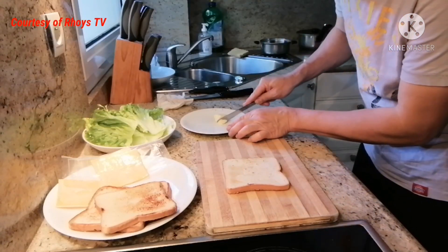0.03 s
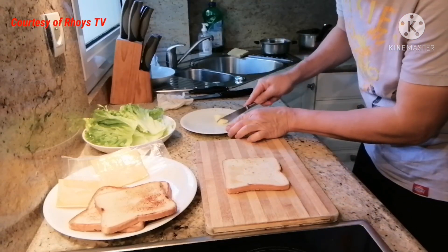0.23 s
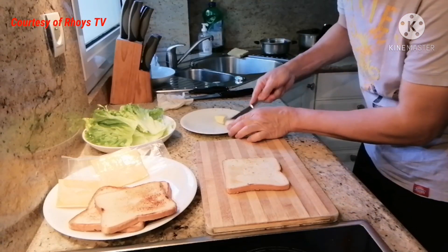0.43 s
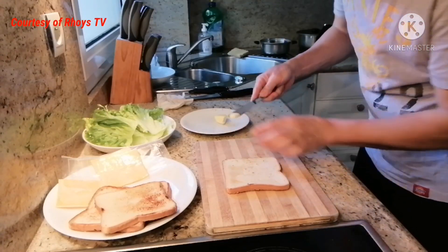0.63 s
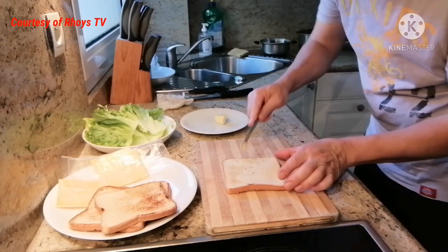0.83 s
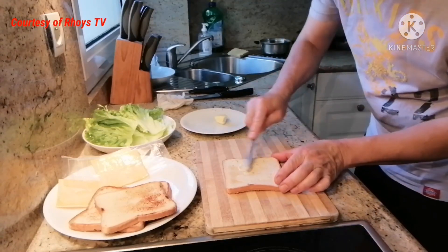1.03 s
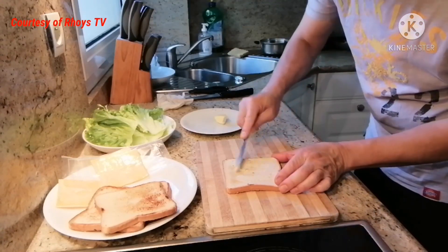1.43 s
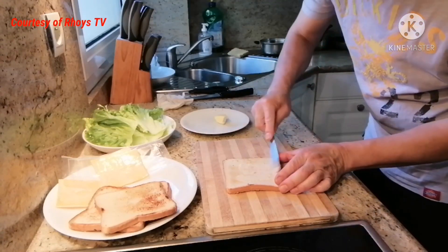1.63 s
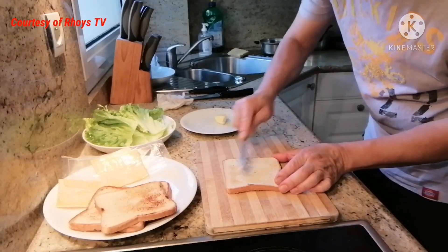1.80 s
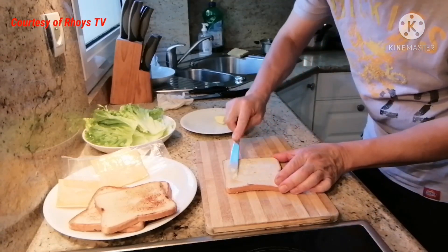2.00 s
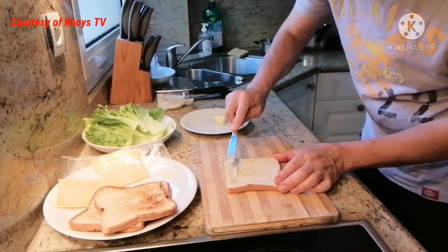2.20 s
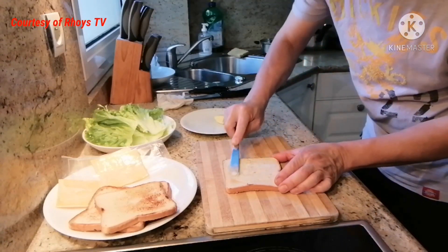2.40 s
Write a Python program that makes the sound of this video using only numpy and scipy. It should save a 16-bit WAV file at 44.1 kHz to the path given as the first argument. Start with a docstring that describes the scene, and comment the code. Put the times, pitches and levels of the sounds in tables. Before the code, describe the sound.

A knife spreads butter on toast. At 0.2 seconds it clinks sharply on a plate, then slides off with a light scrape and thin squeak until 0.6. Fingers rustle faintly around 1 second. Crackly strokes with a slight steel ring come at 1.2, 1.6 and 2.0 seconds, and a brief fourth at 2.5. The small kitchen adds a short echo, soft hiss and low hum.

```python
"""A table knife cuts through butter and clinks on the plate; the recorder's gain dips, then recovers.
The edge slides off the plate with a scrape and a thin squeak, and fingers rustle on a slice of toast.
Then the knife spreads the butter in four quick strokes: the crust crackles under the edge in
thousands of tiny snaps, which set the steel blade ringing.
All along, the small, quiet kitchen adds a short echo, a soft hiss and a low mains hum."""
import sys
import numpy as np
from scipy import signal
from scipy.fft import rfft, irfft
from scipy.io import wavfile

SR = 44100
rng = np.random.default_rng(int(sys.argv[2]) if len(sys.argv) > 2 else 0)


def to_wav(sig):
    """Store sig (one row per channel, or 1-D mono) as 16-bit WAV at the path in sys.argv[1].

    Samples outside -1..1 are clipped; the rate is SR.
    """
    pcm = np.clip(np.atleast_2d(sig), -1, 1) * 32767
    pcm = np.round(pcm).astype(np.int16)
    wavfile.write(sys.argv[1], SR, pcm.T)  # frames by channels


N = 112454
TIME_S = np.arange(N) / SR


# how hard the knife presses, one list per stroke: time_s, pressure_db, rasp_offset_db, ring_offset_db
STROKES = [
    [(1.2, -88, -7, 8), (1.21, -69, 7, -19), (1.216, -54, -27, -7), (1.24, -54, -5.5, 4),
     (1.286, -54.5, 0, -0.5), (1.34, -53.5, -3.5, -1), (1.356, -59.5, -5, -10), (1.372, -52, -7.5, -1),
     (1.398, -56, -6.5, -6), (1.425, -81, -6, -2)],
    [(1.592, -71, -6, 0.5), (1.596, -46, -16, -16), (1.609, -47, -22, -5), (1.641, -40, -21, -5.5),
     (1.659, -48, -6, -0.5), (1.708, -48.5, -8.5, -0.5), (1.719, -47.5, -5.5, 12), (1.737, -43.5, -6.5, -4),
     (1.817, -53, -5, 3.5), (1.845, -75, -4, -9)],
    [(2.03, -44.5, -11.5, -6.5), (2.066, -63, -9, -7), (2.085, -48.5, -10.5, -8), (2.112, -54.5, -9, -4.5),
     (2.158, -42, -11, -4.5), (2.18, -46.5, -13.5, -2), (2.245, -39.5, -14, -6), (2.28, -59.5, -9, -12),
     (2.31, -60, -23, 1.5)],
    [(2.515, -56, -12, -3.5), (2.531, -51.5, -15, -9), (2.549, -68, -26, -13)],
]
def spreading(glide_share=.014):
    """Pressing harder makes crust, crumbs and blade louder; the ring rises a little in each stroke."""
    pressure, rasp_force, ring_force, glide = np.zeros((4, N))
    for stroke in STROKES:
        time_s, pressure_db, rasp_offset_db, ring_offset_db = np.transpose(stroke)
        pressure += level(time_s, pressure_db)
        rasp_force += level(time_s, pressure_db + rasp_offset_db)
        ring_force += level(time_s, pressure_db + ring_offset_db)
        glide += np.interp(TIME_S, [time_s[0], time_s[-1]], [-glide_share, glide_share], left=0, right=0)
    scrape = crust(pressure, rasp_force) + blade_swell()
    crunch = crumbs(pressure)
    scrape += blade(ring_force, glide)
    return kitchen(scrape, early_db=6.5, tail_db=-8.5) + kitchen(crunch)


# tone of the crust's fine, high crackle: pitch_hz, level_db
CRACKLE_TONE = [(1200, -12.5), (2200, -42), (4500, -1.5), (7500, 2), (8300, -3.5), (13500, -8.5),
                (15200, -0.5), (16200, -42)]
# tone of its lower rasp: pitch_hz, level_db
RASP_TONE = [(150, -22), (500, -17), (1000, -14), (1400, -4), (1750, 0), (2700, 1), (3600, -2), (5000, -12),
             (9000, -40)]
def crust(pressure, rasp_force):
    """Tiny grains of crust snap under the moving edge."""
    crackle = through(pressure * snaps(), colour(CRACKLE_TONE))
    rasp = through(rasp_force * snaps(), colour(RASP_TONE))
    return amp(-4.5) * crackle + amp(1) * rasp


# the notes of the steel blade: pitch_hz, width_hz, level_db, left_over_right_db
BLADE_NOTES = [(3150, 330, -7, 2), (5950, 400, -5, 8), (6930, 400, 0, 1), (7380, 300, -6, 2),
               (10200, 600, -14, 0), (14600, 500, -3, 7)]
def blade(force, glide, wander_share=.018):
    """The scraped blade rings; its notes shift as the point of contact moves."""
    drive = force * snaps()
    sound = np.zeros((2, N))
    for pitch_hz, width_hz, level_db, side_db in BLADE_NOTES:
        moving_hz = pitch_hz * (1 + glide + wander_share * wobble(step_s=.018))
        sound += amp(level_db) * pan(side_db) * resonate(drive, moving_hz, width_hz)
    return amp(-4) * sound


# a low and a high note of the blade: pitch_hz, width_hz, level_db, left_over_right_db
LOW_NOTE, HIGH_NOTE = (3190, 420, 0, 3), (6760, 600, 0, 4)
# loudness of the low note: time_s, level_db
SWELL_LEVELS = [(1.668, -56), (1.682, -58), (1.7, -53), (1.72, -76)]
def blade_swell():
    """The blade's low note swells in the middle of the second stroke."""
    return through(level(*np.transpose(SWELL_LEVELS)) * snaps(), ring([LOW_NOTE]))


# tone of a breaking crumb or piece of crust: pitch_hz, level_db
CRUNCH_TONE = [(200, -20), (1000, -13), (1800, -5), (4800, 2), (7200, 0), (8500, -6), (14800, -1),
               (16200, -20)]
def crumbs(pressure):
    """A few larger crumbs break among the fine grains."""
    return amp(-2.5) * through(pressure * snaps(per_s=140, spread_db=2), colour(CRUNCH_TONE))


# the blade landing on the toast or catching on it: start_s, low_note_db, high_note_db, crunch_db
TOAST_TAPS = [(1.2175, -54.5, -56, -60), (1.5943, -74, -55, -57), (1.6377, -72, -42, -43),
              (1.7155, -65, -40.5, -51), (1.754, -73, -36, -70), (2.0212, -40, -44.5, -45.5),
              (2.0254, -69, -37, -46), (2.0373, -53, -49, -47), (2.1209, -49, -59, -63),
              (2.19, -57, -44, -36.5), (2.4931, -51, -43.5, -41.5), (2.5278, -80, -72, -55)]
def taps(rise_s=.0004, decay_s=.002):
    """Each landing or catch is a short, dry crunch that briefly rings the blade."""
    t = np.arange(round(4 * decay_s * SR)) / SR
    shape = (1 - np.exp(-t / rise_s)) * np.exp(-t / decay_s)
    responses = [ring([LOW_NOTE]), ring([HIGH_NOTE]), colour(CRUNCH_TONE)]
    sound = np.zeros((2, N))
    for start_s, *levels_db in TOAST_TAPS:
        burst = unit(rng.choice([-1, 1], len(t)) * shape)
        burst = np.pad(burst, (round(start_s * SR), N))[:N]
        for level_db, response in zip(levels_db, responses):
            sound += amp(level_db) * burst.std() * unit(through(burst, response))
    return kitchen(sound)


# the knife hitting the plate: start_s, level_db
PLATE_HITS = [(0.2012, -20), (0.2025, -6), (.2046, -7), (.2174, -21)]
# ring of knife on plate, muffled by butter and hand: pitch_hz, width_hz, level_db, left_over_right_db
PLATE_NOTES = [(1380, 200, -16, 4), (2340, 170, -2, -3), (2800, 480, -11, 5), (3880, 600, -20, 6),
               (5850, 600, -5, 9), (6250, 800, 0, 10), (6650, 650, -4, 1), (8050, 600, -17, -5),
               (10300, 800, -19, 0)]
# tone of the dry tick as they touch: pitch_hz, level_db
TICK_TONE = [(200, -25.5), (500, -20), (900, -5), (1700, -2), (2800, 6.5), (7000, -2), (9000, -15),
             (11300, -5), (16000, -13.5)]
def clink():
    """The knife comes through the butter and chatters briefly on the plate."""
    hits = sum(amp(db) * (np.arange(N) == round(start_s * SR)) for start_s, db in PLATE_HITS)
    ringing = amp(10.5) * through(hits, ring(PLATE_NOTES))
    tick = amp(2.5) * through(hits, colour(TICK_TONE))
    return kitchen(ringing + tick, early_db=-6, tail_db=-10)


# loudness of the blade sliding off the plate: time_s, level_db
SLIDE_LEVELS = [(0.391, -75), (0.419, -63.5), (0.422, -57.5), (.455, -60), (.467, -53), (0.475, -63),
                (.548, -71), (.565, -90), (.59, -84), (0.605, -68.5), (.615, -82)]
# the notes of that scrape: pitch_hz, width_hz, level_db, left_over_right_db
SLIDE_NOTES = [(2150, 350, -5, 0), (2960, 260, 2, 0), (4230, 300, -3, 0), (5500, 340, -1, 4),
               (6400, 850, 1, 0), (11000, 1200, -12, 0), (14700, 1200, -17, 0)]
# loudness of the squeak as the tip leaves the glaze: time_s, level_db
SQUEAK_LEVELS = [(.48, -65), (.503, -54.5), (.52, -71), (0.535, -52.5), (.56, -93), (.61, -68)]
def slide(squeak_hz=8120, squeak_width_hz=380, squeak_side_db=-8):
    """The edge drags and catches on the glaze as it lifts the butter, ending in a thin squeak."""
    slips = snaps(per_s=1300, spread_db=2.5)
    drag = slips * level(*np.transpose(SLIDE_LEVELS))
    scrape = amp(5.5) * through(drag, ring(SLIDE_NOTES))
    hiss = amp(-13) * through(drag, colour(TICK_TONE))
    squeak_note = ring([(squeak_hz, squeak_width_hz, 0, squeak_side_db)])
    squeak = through(slips * level(*np.transpose(SQUEAK_LEVELS)), squeak_note)
    return kitchen(scrape + hiss + squeak, early_db=-6, tail_db=-10.5)


# loudness of the fingers settling on the toast: time_s, level_db
FINGER_LEVELS = [(.85, -79), (.93, -77.5), (1.199, -74.5)]
def fingers():
    """A faint rustle as the free hand steadies the slice."""
    rustle = snaps() * level(*np.transpose(FINGER_LEVELS))
    return kitchen(through(rustle, colour(TICK_TONE)))


# how long the kitchen's echo takes to fade by 60 dB: pitch_hz, fade_s
ECHO_FADE = [(200, 1), (1000, 0.57), (2400, 0.44), (6500, 0.41), (8500, 0.42), (15000, 0.23)]
def kitchen(sound, early_db=-3, tail_db=-12, early_decay_s=.0058, tail_rise_s=.0065):
    """The sound itself, then quick bounces off the worktop and wall, then a short echo tail."""
    t = np.arange(SR // 2) / SR
    early, tail = rng.standard_normal((2, 2, len(t)))
    early = early * np.exp(-t / early_decay_s)
    early_window = (t > .0007) * (t < 5 * early_decay_s)
    for _ in range(8):  # even out the bounces so that no pitch stands out
        early = irfft(np.exp(1j * np.angle(rfft(early))), len(t)) * early_window
    hz, time_s, spectrum = signal.stft(tail * np.minimum(t / tail_rise_s, 1), SR, nperseg=256)
    fade = amp(-60 * time_s / at_pitch(ECHO_FADE, hz)[:, None])
    tail = signal.istft(spectrum * fade, SR, nperseg=256)[1][:, :len(t)]
    echo = sum(amp(db) * part / np.linalg.norm(part, axis=1, keepdims=True)
               for db, part in [(early_db, early), (tail_db, tail)])
    return sound + through(sound, echo)


# tone of the room's rumble and hiss: pitch_hz, level_db
AIR_TONE = [(20, -5), (50, -10), (140, -1.5), (310, -8), (400, -14.5), (880, -18), (1300, -21.5),
            (2700, -26), (3800, -33), (6500, -29.5), (7800, -36), (15000, -34)]
# how alike it is on the left and right: pitch_hz, likeness_0_to_1
AIR_LIKENESS = [(60, .93), (170, .88), (350, .55), (700, .2), (12000, .1)]
def room_tone(hum_hz=50):
    """Soft rumble and hiss with a steady mains hum, a little louder on the left."""
    hz = np.fft.rfftfreq(N, 1 / SR)
    left, separate = rfft(rng.standard_normal((2, N)))
    likeness = at_pitch(AIR_LIKENESS, hz)
    right = likeness * left + np.sqrt(1 - likeness ** 2) * separate
    air = unit(irfft(np.array([left, right]) * amp(at_pitch(AIR_TONE, hz)), N))
    hum = np.sqrt(2) * np.sin(2 * np.pi * (hum_hz * TIME_S + rng.random()))
    return pan(1.85) * (amp(-62.3) * air + amp(-57) * hum)


def snaps(per_s=3000, spread_db=4, clump_db=3.5, centre_share=.23):
    """Tiny random snaps of uneven size, in clumps; some reach both ears, the rest only one."""
    sizes = amp(spread_db * np.minimum(rng.exponential(1, (3, N)), 4))
    clicks = sizes * rng.choice([-1, 1], (3, N)) * (rng.random((3, N)) < per_s / SR)
    clumps = amp(clump_db * wobble(step_s=.004))
    return unit(clumps * (np.sqrt(centre_share) * clicks[0] + np.sqrt(1 - centre_share) * clicks[1:]))


def ring(notes, size=4096):
    """How an object rings in stereo after one click; wider notes die away sooner."""
    t = np.arange(size) / SR
    response = np.zeros((2, size))
    for pitch_hz, width_hz, level_db, side_db in notes:
        note = t * np.exp(-np.pi * width_hz * t) * np.sin(2 * np.pi * pitch_hz * t)
        response += amp(level_db) * pan(side_db) * unit(note)
    return response / np.sqrt(np.sum(response ** 2) / 2)


def resonate(drive, pitch_hz, width_hz):
    """Turns noise into a ringing note of about the same power that follows a moving pitch."""
    turn = np.exp(2j * np.pi * np.cumsum(pitch_hz) / SR)
    decay = np.exp(-np.pi * width_hz / SR)
    smooth = signal.lfilter([(1 - decay) ** 2], np.poly([decay, decay]), drive / turn)
    return (turn * smooth).real * 2 * np.sqrt(2 / (1 - decay))


def colour(tone, size=2048):
    """A short click with the given tone and an energy of 1."""
    log_gain = np.log(amp(at_pitch(tone, abs(np.fft.fftfreq(size, 1 / SR)))))
    response = np.fft.ifft(np.exp(np.conj(signal.hilbert(log_gain)))).real[:size // 2]
    return response / np.linalg.norm(response)


def through(sound, response):
    """Gives a sound the ring, tone or echo of a response."""
    return signal.fftconvolve(np.atleast_2d(sound), np.atleast_2d(response), axes=1)[:, :N]


def level(times_s, levels_db):
    """Gain along a loudness curve, silent outside it."""
    return amp(np.interp(TIME_S, times_s, levels_db, left=-150, right=-150))


def at_pitch(table, hz):
    """Looks up a table's value at any pitch, blending between rows."""
    pitches_hz, values = np.transpose(table)
    return np.interp(np.log(hz + 1), np.log(pitches_hz + 1), values)


def wobble(step_s):
    """Random wander between -1 and 1 with a new aim every step."""
    return np.interp(TIME_S / step_s, np.arange(N), rng.uniform(-1, 1, N))


def pan(left_over_right_db):
    """Left and right gains for a level difference."""
    return amp(np.array([[left_over_right_db], [-left_over_right_db]]) / 2)


def amp(db):
    """Decibels to gain."""
    return 10 ** (np.asarray(db) / 20)


def unit(sound):
    """Scales a sound to an average (rms) level of 1."""
    return sound / np.sqrt(np.mean(sound ** 2) + 1e-20)


def scene(right_lag_s=.0003):
    """Plate and toast over the room tone; the right microphone is a little further away."""
    left, right = clink() + slide() + spreading() + taps() + fingers()
    right = np.pad(right, (round(right_lag_s * SR), 0))[:N]
    return np.array([left, right]) + room_tone()


def record(dry, threshold_db=-48.5, dip_share=.22, release_db_per_s=97.5, top_hz=15900):
    """The recorder turns loud moments down, recovers quickly and cuts the highest treble."""
    power = signal.lfilter([1 / 400], [1, 1 / 400 - 1], (dry ** 2).mean(0))  # averaged over about 9 ms
    fall_db = TIME_S * release_db_per_s
    held_peak_db = np.maximum.accumulate(10 * np.log10(power + 1e-14) + fall_db) - fall_db
    gain = amp(-dip_share * np.maximum(held_peak_db - threshold_db, 0))
    low_pass = signal.firwin(255, top_hz, window=("kaiser", 8), fs=SR)
    return signal.oaconvolve(dry * gain, low_pass[None], "same", axes=1)


dry = scene()
out = record(dry)
to_wav(out)
```